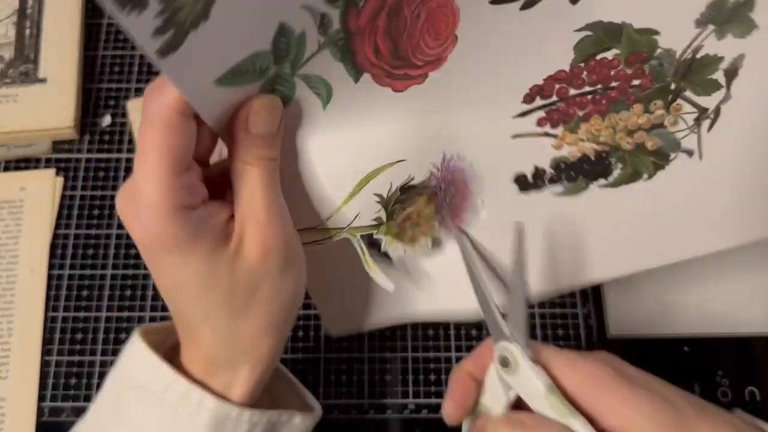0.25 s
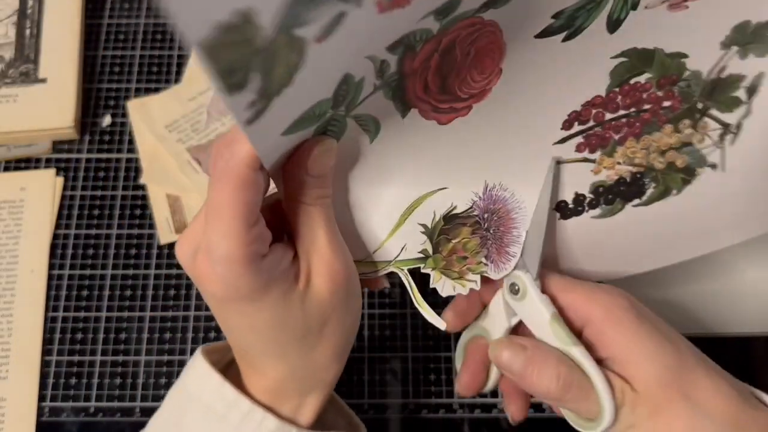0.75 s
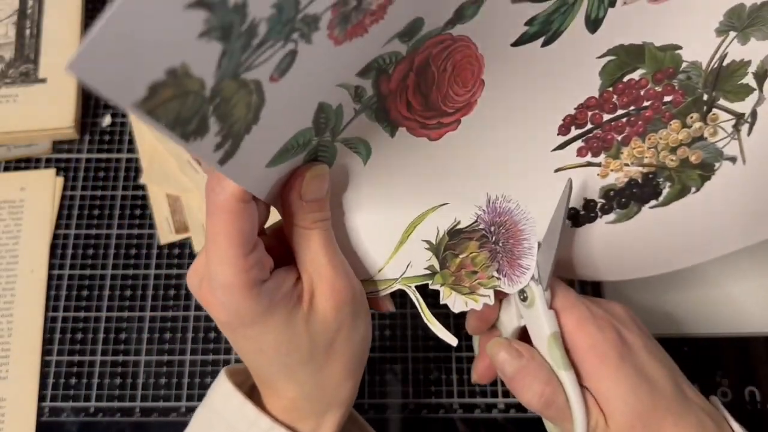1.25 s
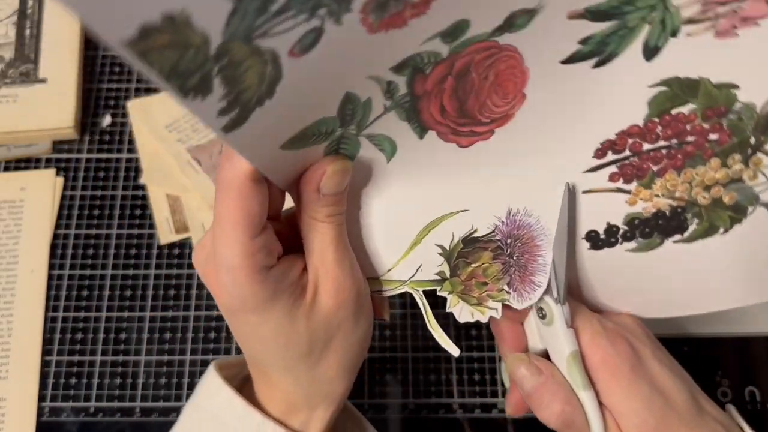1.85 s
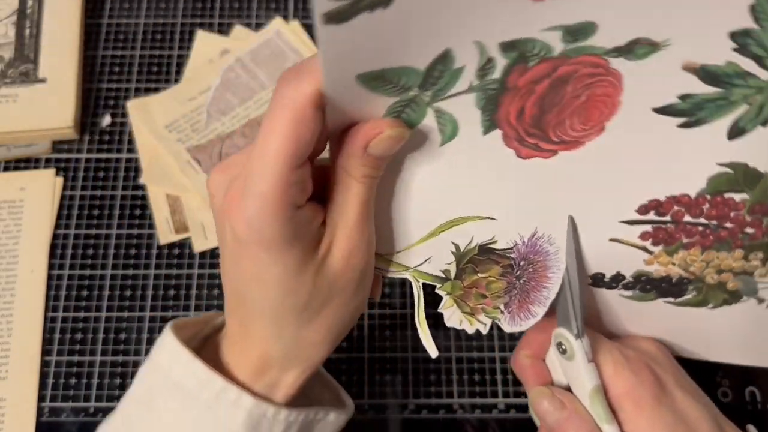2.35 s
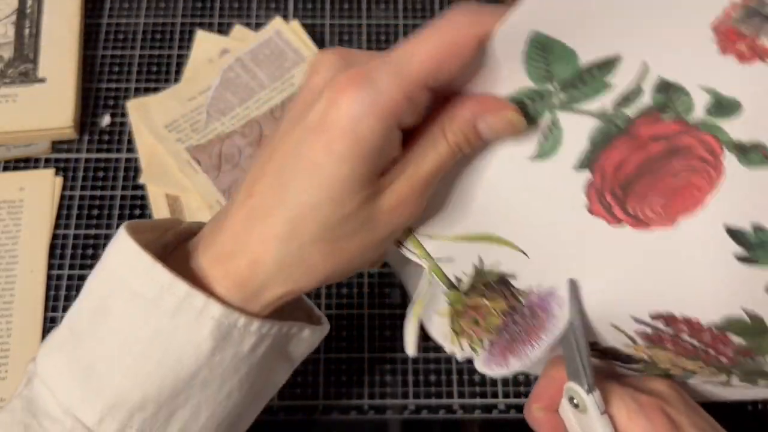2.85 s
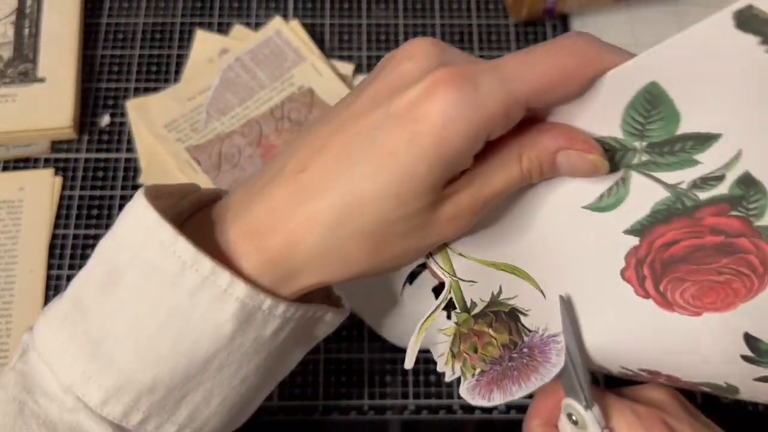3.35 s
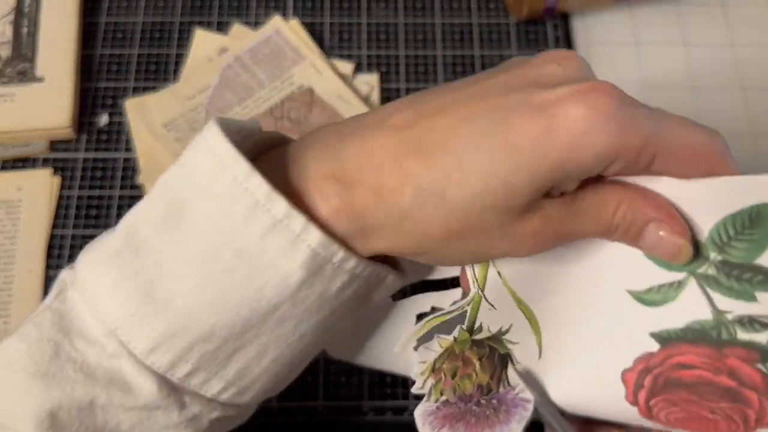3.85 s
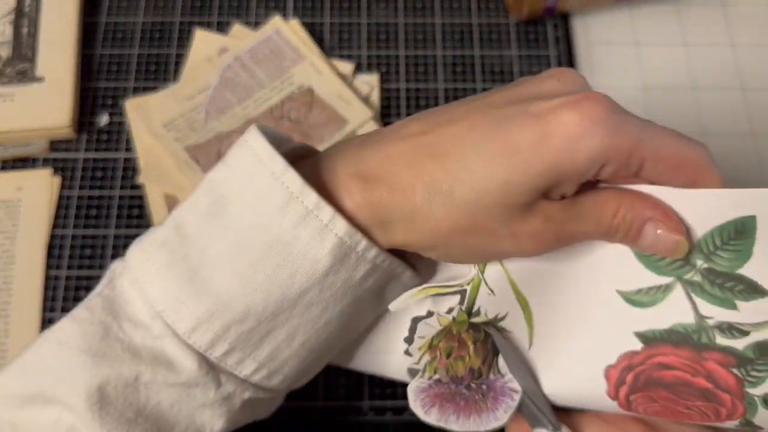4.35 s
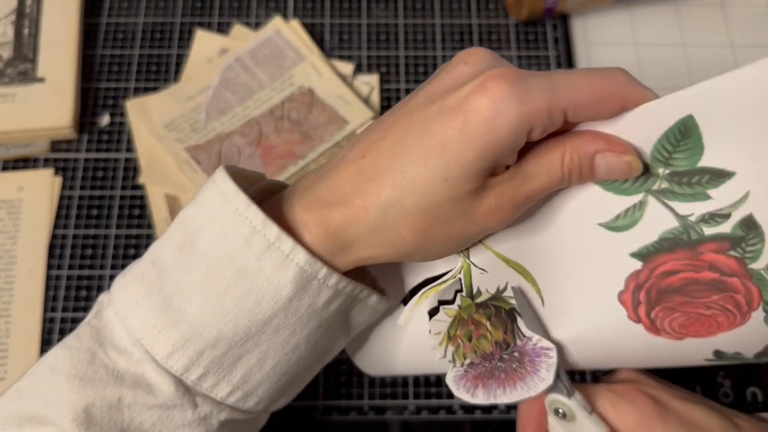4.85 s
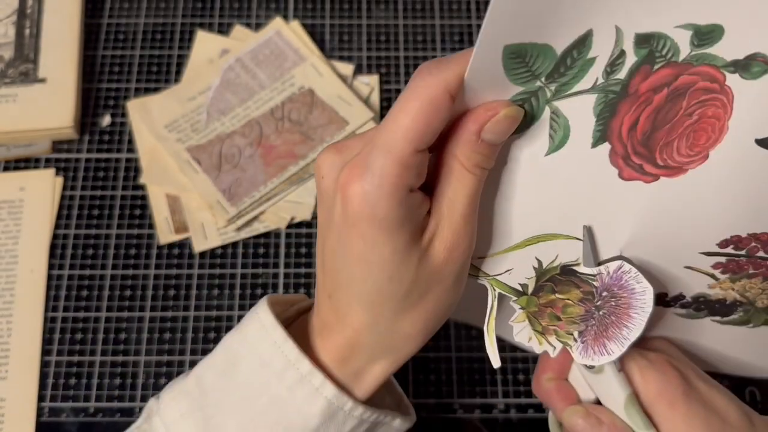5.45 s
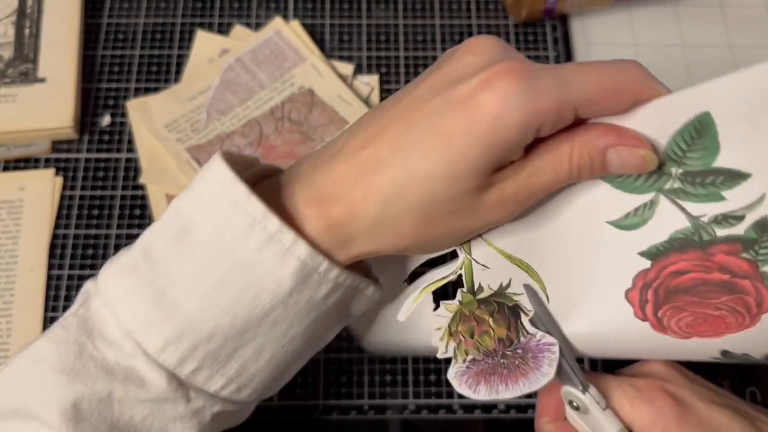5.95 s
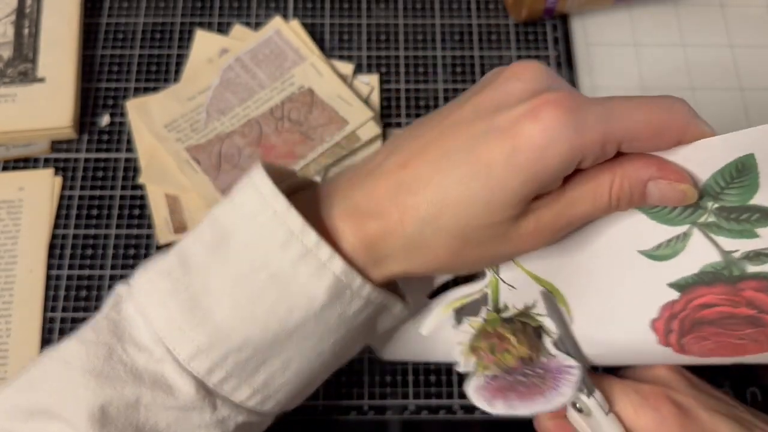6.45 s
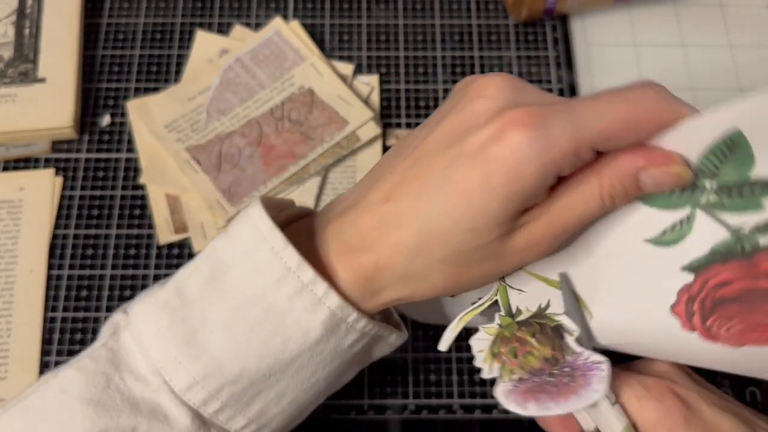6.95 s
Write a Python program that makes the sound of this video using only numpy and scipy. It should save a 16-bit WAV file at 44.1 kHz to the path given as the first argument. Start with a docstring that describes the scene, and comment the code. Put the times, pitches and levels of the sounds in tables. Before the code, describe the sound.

Dry, close and mono: paper hisses over blades and fingers, blades bite with short bright cracks, and the sheet rings papery and buckles with dull pops. The start is busy, the next two seconds are gentle, then handling grows louder from about three seconds. Irregular snips and swishes continue, with one faint brief squeak near the end, over a low, quiet room tone.

```python
"""Scissors cutting a printed sheet

Small scissors snip close under a mono microphone: bursts of noise through resonances make the blades' bites.
The sheet hisses as it slides over blades and fingers (grainy filtered noise), booms and flutters as it flexes
(low noise), pops when a buckle flips (a pressure pulse and crumpling noise) and squeaks once, faintly (a tone).
A quiet room of steady coloured noise lies underneath."""
import sys
import numpy as np
from scipy import signal
from scipy.fft import rfft, irfft, next_fast_len
from scipy.io import wavfile
from scipy.ndimage import uniform_filter1d, map_coordinates

SR = 44100
rng = np.random.default_rng(int(sys.argv[2]) if len(sys.argv) > 2 else 0)


def store_wav(level_fs):
    """Save 16-bit WAV to argv[1]."""
    pcm = np.round(np.clip(np.atleast_2d(level_fs), -1, 1) * 32767)
    wavfile.write(sys.argv[1], SR, pcm.T.astype(np.int16))


N = 317520


def amp(db):
    """Decibel law: the amplitude gain of a level in dB."""
    return 10 ** (np.asarray(db) / 20)


def unit(x):
    """Normalization of a signal to rms 1."""
    return x / np.sqrt(np.mean(x ** 2) + 1e-20)


def wobble(rate):
    """Random modulation: a smooth spline through normal random knots, rate knots a second."""
    knots = rng.standard_normal(int(N * rate / SR) + 4)
    return map_coordinates(knots, [np.arange(N) * rate / SR])


def filtered(x, response):
    """Linear filtering: the spectrum of x times a response of frequency in Hz."""
    size = next_fast_len(N + SR // 2)
    hz = np.fft.rfftfreq(size, 1 / SR)
    return irfft(rfft(x, size) * response(hz), size)[:N]


def along(points, hz):
    """Spectral envelope: the gain through (Hz, dB) points on a logarithmic frequency axis."""
    f, db = np.transpose(points)
    return amp(np.interp(np.log(hz + 1), np.log(f + 1), db))


def coloured(x, spectrum):
    """Spectral shaping: x with the colour of (Hz, dB) points, rms 1."""
    return unit(filtered(x, lambda hz: along(spectrum, hz)))


def curves(rows):
    """Linear interpolation in time: one value per sample for each column after the time."""
    s, *columns = np.transpose(rows)
    return [np.interp(np.arange(N) / SR, s, column) for column in columns]


def room():
    """Stationary background: steady noise with most of its energy at low frequencies."""
    # Each row: frequency in Hz, relative level in dB.
    room_spectrum = [(12, -8.5), (25, -6), (200, -23), (450, -21), (2500, -36), (4600, -65), (9000, -53),
                     (16000, -78)]
    return amp(-58.0) * coloured(rng.standard_normal(N), room_spectrum)


def flexing():
    """Radiation by a bending plate: the wide face pumps slow air and flutters in lumps."""
    # How the sheet flexes. Each row: time in seconds, boom level in dB, flutter against the boom in dB.
    flex_levels = [(0.0, -49.5, -23), (0.28, -47.5, 4.5), (0.38, -54, 4.5), (0.44, -39, 1), (0.82, -52, -6),
                   (2.77, -51, -11.5), (2.85, -27.5, -6.5), (2.93, -39.5, -16), (3.05, -39, -3),
                   (3.55, -44.5, -26), (3.71, -37, -2), (3.83, -55, -5), (3.875, -29.5, -1.5),
                   (3.94, -44, -8), (4.15, -35, -22), (4.24, -48, -7), (5.01, -49.5, -13),
                   (5.19, -34.5, -1), (5.52, -54, -12), (5.59, -45.5, -11), (6.02, -36.5, -12.5),
                   (6.08, -67, 12), (6.13, -28.5, -36), (6.24, -52.5, -9), (6.48, -36.5, -8),
                   (6.64, -43, -22), (7.06, -41, -23), (7.2, -59, -22)]
    # Noise colours. Each row: frequency in Hz, relative level in dB.
    boom_spectrum = [(12, -3.5), (25, -2.5), (50, -4), (90, -22), (200, -58), (600, -82)]
    flutter_spectrum = [(40, -13), (75, 6), (120, 0.5), (200, -6), (400, -19), (700, -66)]
    boom_db, flutter_db = curves(flex_levels)
    boom = coloured(amp(2.2 * wobble(12)) * rng.standard_normal(N), boom_spectrum)
    flutter = coloured(amp(3.5 * wobble(18)) * rng.standard_normal(N), flutter_spectrum)
    return amp(boom_db) * (boom + amp(flutter_db) * flutter)


def patchy(depth_db):
    """Time-frequency modulation: white noise whose gain varies in small streaks, narrow in frequency."""
    z = signal.stft(rng.standard_normal(N), nperseg=256)[2]
    field = uniform_filter1d(rng.standard_normal(z.shape), size=2, axis=0)  # across frequency
    field = uniform_filter1d(field, size=12, axis=1)  # along time
    return signal.istft(z * amp(depth_db * unit(field)), nperseg=256)[1][:N]


def sliding():
    """Friction noise: fibres catch in fine grains; each stroke swells, stops short and settles."""
    # Strokes over blades and fingers. Each row: time of the peak in seconds, treble hiss level in dB,
    # middle against the treble in dB, sheet murmur against the treble in dB,
    # rise in seconds, fall in seconds (both for 20 dB).
    strokes = [(0, -47.5, -13.5, -9.5, .1, 0.064), (.1, -62.5, -9, -13, 0.078, 0.089),
               (.205, -47, -7, 0, 0.025, 0.12), (0.247, -48, 7, 15.5, 0.022, 0.057),
               (0.332, -35.5, -9.5, -10.5, 0.039, 0.035), (.46, -53.5, -6, -6, 0.15, 0.28),
               (0.474, -63, 10, 21.5, 0.02, 0.058), (0.666, -45, -4, -8, 0.099, 0.046),
               (0.786, -54.5, 0, 2, 0.057, 0.057), (0.947, -59.5, 1, 6, 0.017, 0.028),
               (1.053, -53.5, -2, -0.5, 0.069, 0.031), (1.147, -52.5, -1.5, 2, 0.032, 0.032),
               (1.36, -56.5, -3.5, -0.5, 0.16, 0.26), (1.721, -50, -3, -6, 0.11, 0.027),
               (1.85, -51, -2.5, -4.5, 0.14, 0.081), (1.99, -49, -1, -0.5, 0.029, 0.071),
               (2.25, -51.5, -6.5, -9, 0.14, 0.056), (2.54, -58, -1, 2.5, 0.6, 0.2),
               (2.788, -44, -4, -2.5, 0.0057, 0.049), (2.854, -36, -3.5, -9, 0.067, 0.039),
               (3.053, -47, 0, -1, 0.072, 0.053), (3.19, -50, -3.5, -4, 0.043, 0.1),
               (3.299, -58, 11, 15.5, 0.016, 0.072), (3.53, -46.5, -6.5, -13.5, 0.14, 0.17),
               (3.771, -45.5, -5.5, -2.5, 0.023, 0.046), (3.87, -40.5, 1.5, 0, 0.021, 0.028),
               (4.02, -51, -15, -13, 0.055, 0.15), (4.13, -36, -6.5, -22.5, 0.12, 0.095),
               (4.42, -54.5, -3, -4, 0.026, 0.18), (4.6, -51, -6, -6.5, 0.11, 0.068),
               (5.04, -54.5, -2, -16, 0.19, 0.17), (5.22, -58.5, -5.5, 3.5, 0.18, 0.21),
               (5.58, -53.5, -6, -11, 0.17, 0.96), (5.619, -70, 4, 34, 0.016, 0.028),
               (5.909, -44.5, -5, -4, 0.11, 0.045), (5.999, -54, -2, -18, 0.066, 0.077),
               (6.13, -50.5, -4, -21, 0.04, 0.053), (6.309, -42.5, -17, -10, 0.016, 0.032),
               (6.408, -37.5, -5.5, -23, 0.11, 0.083), (6.53, -59.5, -0.5, 3, 0.082, 0.15),
               (6.99, -48.5, -4.5, -9.5, 0.35, 0.24)]
    # Colours of the three bands. Each row: frequency in Hz, relative level in dB.
    treble_spectrum = [(2530, -37), (4300, -7.5), (8180, 1), (9180, 0), (10300, -10), (11400, -6),
                       (16000, -22)]
    middle_spectrum = [(1000, -9.5), (1700, 2.5), (1920, 7.5), (2900, 2.5), (3650, 1), (4400, -4),
                       (5720, -26.5)]
    murmur_spectrum = [(150, -1), (320, -6.5), (580, -9), (790, -2.5), (1400, -8), (1620, -26), (2300, -89)]
    resting_db = -71  # the fingers never quite leave the sheet
    rise_roundness, fall_roundness = 1.5, 2.8  # 1 = pointed, 3 = holds its level and turns sharply
    settle_db, settle_slower = -43, 0.67  # a soft settling loses 20 dB in this many times the fall

    t = np.arange(0, N / SR + .002, .001)  # envelopes in steps of 1 ms
    levels = amp(resting_db) * np.ones((3, len(t)))
    for s, db, middle_db, murmur_db, rise, fall in strokes:
        before = abs(np.minimum(t - s, 0) / rise)
        after = abs(np.maximum(t - s, 0) / fall)
        swell = amp(db - 20 * before ** rise_roundness)
        stop = amp(-20 * after ** fall_roundness)
        settle = amp(settle_db - 20 * after / settle_slower)
        levels += swell * (stop + settle) * amp([[0], [middle_db], [murmur_db]])
    treble, middle, murmur = curves(np.vstack([t, levels]).T)

    grains = amp(1.2 * wobble(60) + 1.5 * wobble(400))
    rub = grains * patchy(depth_db=2.2)
    return (treble * coloured(rub, treble_spectrum)
            + middle * coloured(rub, middle_spectrum)
            + murmur * coloured(rub, murmur_spectrum))


def squeaks():
    """Tonal oscillation: a sine, slightly unsteady in level and phase, swells and fades."""
    # Faint, near one resonance of the sheet. Each row: start and end in seconds, frequency in Hz, level in dB.
    squeak_tones = [(6.508, 6.595, 790, -50)]
    t = np.arange(N) / SR
    out = np.zeros(N)
    for start, end, hz, db in squeak_tones:
        progress = np.clip((t - start) / (end - start), 0, 1)
        swell = np.sin(np.pi * progress) ** .25
        tone = np.sin(2 * np.pi * hz * t + 0.43 * wobble(50))
        out += amp(db + 3 * wobble(70)) * swell * tone
    return out


def pops():
    """Snap-through buckling: a flip gives one low push, then a dull crumpling whose top dies first."""
    # Buckles that flip. Each row: time in seconds, level in dB, time in seconds for the top of the crumpling
    # to fall by 60 dB (its low part takes twice as long), time scale of the push in milliseconds.
    flips = [(0.19, -33, 0.084, 1.8), (0.223, -26.5, 0.074, 1.9), (0.456, -25.5, 0.081, 5.6),
             (1.169, -31, 0.059, 1.4), (1.964, -35.5, 0.068, 1.4), (2.16, -32.5, 0.047, 0.98),
             (2.233, -37, 0.27, 1.9), (2.608, -44, 0.085, 1.1), (3.05, -24, 0.059, 1.8),
             (3.098, -23, 0.076, 1.5), (3.129, -26, 0.067, 1.3), (3.181, -33, 0.19, 0.76),
             (3.29, -31.5, 0.16, 1), (3.861, -27.5, 0.06, 3.9), (3.983, -33.5, 0.027, 3.8),
             (4.352, -28, 0.2, 1.7), (4.772, -36, 0.11, 2.9), (5.092, -35, 0.045, 2.1),
             (5.18, -28, 0.055, 0.63), (5.264, -35, 0.17, 1.1), (5.607, -21, 0.14, 1.7),
             (5.65, -24, 0.096, 2.3), (5.875, -33.5, 0.19, 3.2), (6.123, -24, 0.047, 4.5),
             (6.978, -32, 0.1, 1.6)]
    t = np.arange(SR // 3) / SR
    out = np.zeros(N + SR)
    for s, db, t60, push_ms in flips:
        u = t * 1000 / push_ms
        push = -u * (2 - u) * np.exp(1 - u)  # one swing each way
        noise = rng.standard_normal(len(t))
        low = unit(signal.lfilter([1], [1, -1.94, .9409], noise))
        high = unit(signal.lfilter([1, -1], [1, -1.82, .8281], noise))
        fall_db = -60 * t / t60
        crumple = .5 * low * amp(fall_db / 2) + 0.15 * high * amp(fall_db)
        onset = 1 - np.exp(-u)
        out[round(s * SR):][:len(t)] += amp(db) * (0.92 * push + crumple * onset)
    return out[:N]


def ringing(envelope, noise, modes, tilt_db=0, pivot_hz=1000):
    """Modal superposition: a noise burst through causal resonances keeps the energy of its envelope."""
    size = 2 * len(noise)
    f = np.fft.rfftfreq(size, 1 / SR)
    centre, width, db = np.transpose(modes)[:, :, None]
    # The tilt in dB per octave stops half an octave from the pivot.
    tilt = tilt_db * np.clip(np.log2(centre / pivot_hz), -.5, .5)
    scatter = 2.5 * rng.standard_normal(centre.shape)  # dB; each bite excites the modes in new proportions
    sign = (-1) ** np.arange(len(centre))[:, None]
    resonance = 1j * f * width / (centre * centre - f * f + 1j * f * width)
    gain = (sign * amp(db + tilt + scatter) * resonance).sum(axis=0)
    out = irfft(rfft(envelope * noise, size) * gain)
    return out * np.linalg.norm(envelope) / np.linalg.norm(out)


def bites():
    """Ratchet motion: rows like those of the snaps, nearly evenly spaced along each slow cut."""
    # Slow cuts in small bites. Each row: start and end in seconds, gap between bites in seconds,
    # treble level in dB, middle against the treble in dB, sheet ring against the treble in dB.
    cuts = [(0.616, .69, 0.022, -43, -7, 3), (2.291, 2.315, 0.016, -43.5, 4, 6.5),
            (3.602, 3.69, 0.016, -47.5, -5.5, -3), (4.682, 4.76, 0.014, -53.5, -2.5, -1),
            (6.508, 6.54, .021, -50.5, 5, -13), (6.626, 6.682, 0.015, -59.5, 11.5, -10)]
    rows = []
    for start, end, gap, db, middle_db, ring_db in cuts:
        times = np.arange(start, end, gap)
        late, size, colour, tear = rng.standard_normal((len(times), 4)).T
        rows += [(t + 0.00087 * a, db + 0.59 * b, middle_db + 0.82 * c, ring_db + 3 * c, abs(3 + 2.0 * d))
                 for t, a, b, c, d in zip(times, late, size, colour, tear)]
    return rows


def snaps():
    """Impulsive excitation of modes: fibres tear in spiky cracks, then the sheet rustles and rings on."""
    # Blade bites and creases. Each row: time in seconds, treble level in dB, middle against the treble in dB,
    # sheet ring against the treble in dB, tear length in milliseconds.
    snap_rows = [(.187, -33.5, -3.5, 5.5, 6.1), (.2338, -26, -5.5, 14, 6.4), (.2516, -31.5, 7.5, 12.5, 4.5),
                 (.4225, -40, -7, -1, 15), (.4509, -36, -1, -3, 1.3), (.4575, -57, 6, 24.5, 2),
                 (.4655, -48.5, 9, 21, 1.1), (.4989, -41, -10, -7, 2.2), (.5445, -40.5, -7, -19, 4.3),
                 (.591, -48, 1, -6, 7.4), (1.2262, -54.5, 1, 16, 14), (1.5425, -41, 2, 5.5, 2.2),
                 (1.5652, -41, 2.5, 6, 1.6), (1.5841, -43, -1.5, 6, 6.4), (1.6919, -44, 1.5, 10.5, 4.3),
                 (1.7095, -44, 0, 7, 4.1), (1.7303, -48, 5, 5.5, 3.4), (1.7562, -45.5, 1.5, 6.5, 3.1),
                 (1.8581, -48, -2.5, 10.5, 8.8), (1.8726, -46, -2, 11, 4.5), (1.9651, -39.5, -3.5, 12, 6),
                 (1.9986, -42, -4, 10.5, 3.1), (2.036, -44.5, 2, 8, 3.4), (2.1602, -39, -3.5, 3, 4.8),
                 (2.2304, -40.5, -5, 10.5, 6.2), (2.2565, -43.5, -1, 12.5, 10.7), (2.3374, -44, -3, 1, 3.2),
                 (2.3466, -42.5, -2, 7.5, 5.4), (2.375, -34.5, -2, 4, 7.6), (2.6049, -32, -7.5, 1, 4.9),
                 (2.6299, -33.5, -4.5, 5, 4.5), (2.657, -30.5, -0.5, -2, 2.4),
                 (3.0092, -33, -6.5, 0.5, 7.6), (3.021, -34, -19, -26, 4.7),
                 (3.0434, -32.5, -1.5, -13, 5.6), (3.0506, -32, -5.5, -21, 4.8),
                 (3.0582, -32, -7, -23, 1.4), (3.079, -33.5, 2, -7, 2), (3.0975, -45, -4, 19.5, 11),
                 (3.1692, -41, -4, 5, 3.4), (3.1802, -36, -3.5, -14, 3.6), (3.2336, -36.5, -3, -0.5, 2.4),
                 (3.2613, -41, -3, -8, 6.1), (3.287, -34, -5.5, 5.5, 8.1), (3.311, -24.5, -10.5, -24, 2.1),
                 (3.3402, -29, -8.5, -34, 3.7), (3.4561, -35, -7, -26, 1), (3.7004, -34, -1.5, -11, 1.06),
                 (3.7233, -35, -9, -29, 1.4), (3.76, -39.5, -2, 8.5, 10.5), (3.8267, -35, -13, -38, 1.8),
                 (3.8566, -31.5, -8, 2, 2), (3.863, -28.5, -5.5, 0, 5), (3.872, -30.5, 4.5, 1, 1.2),
                 (3.8795, -32.5, -10, 0.5, 2.6), (3.8938, -39.5, 1, 6, 3.5), (3.9895, -45, -14, 1, 6.5),
                 (4.2967, -47.5, -4, -10, 1.9), (4.3506, -36, -5.5, 2, 6.8), (4.3765, -38, -10, -25, 1.7),
                 (4.383, -27, -7, -23, 1.4), (4.4055, -42, -5, -22, 1.8), (4.4096, -29, -10, -8.5, 4),
                 (4.4404, -39, -9, -10, 4), (4.4575, -42.5, -1, -20, 3.4), (4.4805, -43, 1, -20, 5.2),
                 (4.4915, -46, 3, -22, 3.3), (4.503, -42, -2, -20, 3), (4.5225, -39, -5, -22, 4.3),
                 (4.5405, -42, 4, -22, 1.9), (4.5545, -41, -8, -20, 3), (4.569, -52, -3.5, -20, 2.4),
                 (4.577, -39.5, 0, -11, 4.3), (4.592, -46, -2, -15, 5.5), (4.621, -36, -3, -5, 4.5),
                 (4.7732, -26, -4, -6, 1.5), (4.7811, -37.5, -3, -22, 7), (4.848, -47, -11, -12, 1.7),
                 (5.0529, -46.5, -2.5, -20, 4.4), (5.318, -34.5, 1, -11, 2.1), (5.3606, -40.5, -1, 3, 12),
                 (5.381, -48, -0.5, -3, 6.6), (5.606, -42, 1.5, 16.5, 2.3), (5.8218, -25, 0.5, -8, 1.2),
                 (5.8281, -42, 5, -6, 0.66), (5.8777, -26.5, 2.5, -12, 2.8), (5.89, -44, -10, -22, 4),
                 (5.9043, -35.5, -2, 3.5, 2.3), (5.9145, -40.5, 2, 2, 2.3), (5.983, -28.5, -0.5, -5.5, 5.9),
                 (6.1209, -20.5, -8, -2.5, 5.8), (6.248, -62, -3, -36, 3.1), (6.7308, -44.5, 3.5, -14, 2.2),
                 (6.7498, -42, 3, 9.5, 2.8), (6.7732, -41, -2.5, 3.5, 8.2)]
    # Resonances of a snap. Each row: frequency in Hz, width in Hz, relative level in dB.
    edge_modes = [(5400, 1700, 2.5), (6530, 920, 6), (8570, 1130, 7), (13400, 3400, -9.5)]
    middle_modes = [(2015, 130, 0.98), (2316, 165, 2.7), (2594, 330, 0), (3610, 550, 1.6)]
    sheet_modes = [(150, 98, 1), (420, 250, -1), (792, 40, 11), (907, 35, 8), (1055, 50, 7), (1225, 58, 4),
                   (1330, 50, 4), (1440, 70, 5)]
    # The grip shifts weight between low and high resonances.
    # Each row: time in seconds, sheet tilt in dB per octave, middle tilt in dB per octave.
    grip = [(0.3, 1.5, -9), (1.6, 8, -17), (1.9, -14.5, -7), (3.3, -7, -7), (3.8, 12.5, -11), (4.5, 14, 3),
            (5.3, -18, -6), (5.88, 5, 9), (5.98, 22, -13), (6.12, -6, 1)]
    tear_sag_db = 6.5  # a tear loses this much over its length
    rustle_db, rustle_t60_s = -10.5, 0.093

    t = np.arange(4096) / SR
    cracks = np.pad(unit(amp(3.7 * wobble(2000))), (0, SR), "wrap")
    rustle = (1 - np.exp(-t / 0.0045)) * amp(rustle_db - 60 * t / rustle_t60_s)
    ring = (1 - np.exp(-t / 0.00007)) * (amp(-60 * t / 0.015) + amp(-13 - 60 * t / 0.11))
    out = np.zeros(N + SR)
    sheet_tilt, middle_tilt = curves(grip)
    for s, db, middle_db, ring_db, tear_ms in list(snap_rows) + bites():
        after = np.maximum(t - tear_ms / 1000, 0)
        tear_db = 4 - tear_sag_db * t * 1000 / tear_ms - 60 * after / .004
        burst = (1 - np.exp(-t / .0002)) * amp(tear_db) + rustle
        noise = rng.standard_normal((2, len(t)))
        at = round(s * SR)
        spiky = noise[0] * cracks[at:at + len(t)]
        edge = ringing(burst, spiky, edge_modes)
        middle = ringing(burst, spiky, middle_modes, middle_tilt[at], pivot_hz=3070)
        sheet = ringing(ring, noise[1], sheet_modes, sheet_tilt[at])
        out[at:at + 2 * len(t)] += amp(db) * (edge + amp(middle_db) * middle + amp(ring_db) * sheet)
    return out[:N]


def scene():
    """Superposition: all pressures add at one microphone, heard alike on both sides."""
    mono = room() + flexing() + sliding() + squeaks() + pops() + snaps()
    return np.tile(mono, (2, 1))


def record(dry):
    """Frequency response: a microphone with a dip and a falling top, and a recorder with a band limit."""
    # Each row: frequency in Hz, gain in dB.
    microphone_response = [(4150, -3.5), (4800, -5.5), (5400, -2.5), (12500, -11), (15700, -13.5),
                           (16400, -27)]
    top_hz = 16450  # nothing is kept from here up
    return np.array([filtered(side, lambda hz: along(microphone_response, hz) * (hz < top_hz)) for side in dry])


dry = scene()
out = record(dry)
store_wav(out)
```